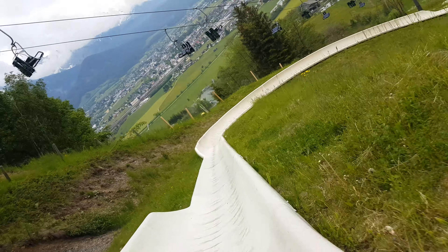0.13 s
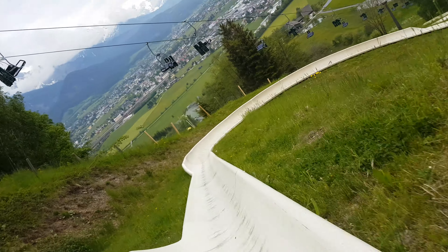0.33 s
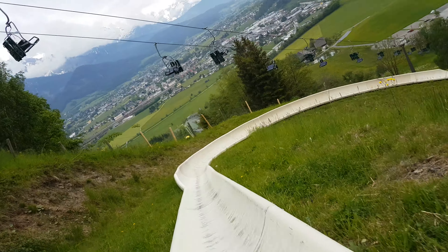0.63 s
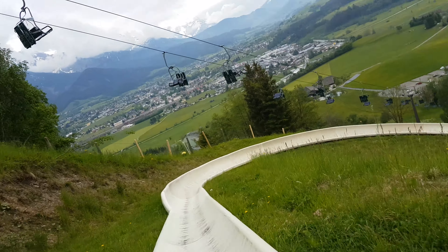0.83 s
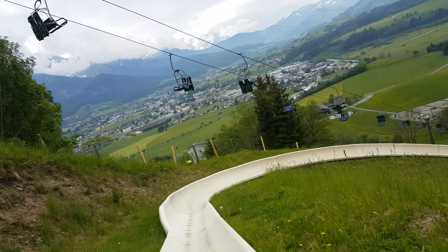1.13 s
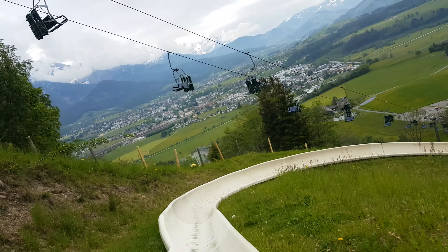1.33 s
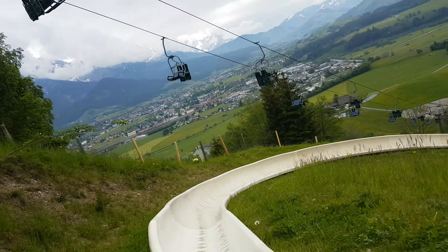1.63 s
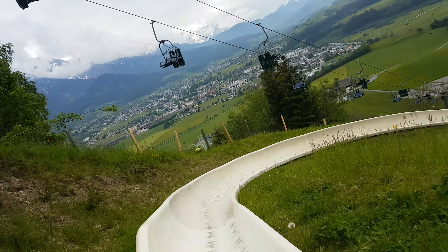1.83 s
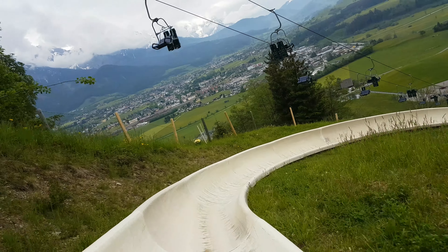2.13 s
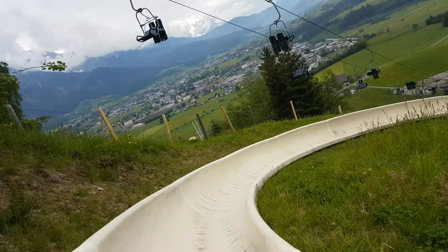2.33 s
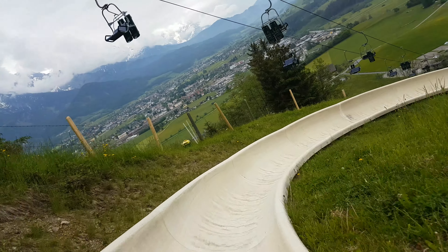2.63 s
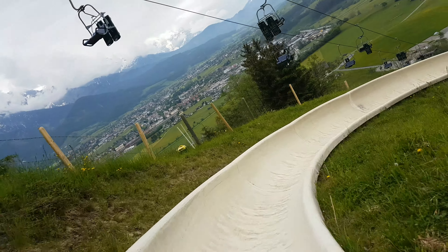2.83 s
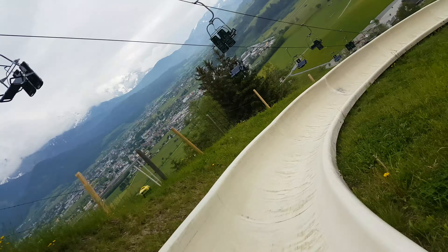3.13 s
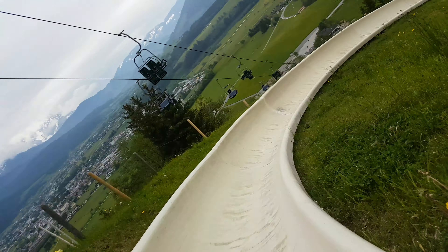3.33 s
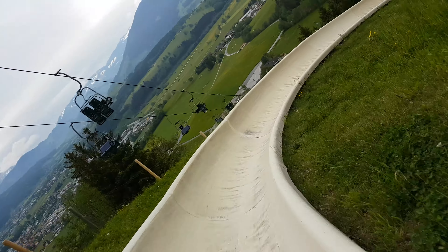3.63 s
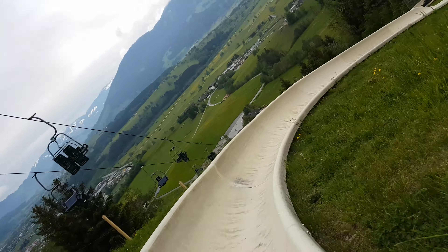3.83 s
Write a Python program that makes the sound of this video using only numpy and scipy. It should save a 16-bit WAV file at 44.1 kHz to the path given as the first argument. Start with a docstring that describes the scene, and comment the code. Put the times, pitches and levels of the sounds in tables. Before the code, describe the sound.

Sled wheels roar along a gritty trough slide, swelling and easing, with hollow booming joint bumps

```python
"""Wheels of a plastic sled roar down a gritty trough-shaped slide, heard from the seat: grains of contact
shake the shell, louder in the bends and pulsing once a turn. Joints in the track knock on the front axle,
then on the rear one, as impulses and decaying chatter that set the shell booming. Runners hiss as filtered
noise, gritty bursts scuff and bump, narrow noise bands sing or ring, grit crackles and wind brushes the mic."""
import sys
import numpy as np
from scipy import signal
from scipy.fft import rfft, irfft, next_fast_len
from scipy.io import wavfile

SR = 44100
rng = np.random.default_rng(int(sys.argv[2]) if len(sys.argv) > 2 else 0)


def unload_wav(signal):
    """Save mono or channel-first audio to the path in sys.argv[1] as 16-bit WAV at rate SR, clipped to [-1, 1]."""
    wavfile.write(
        sys.argv[1],
        SR,
        np.round(np.clip(np.atleast_2d(signal).T, -1, 1) * 32767).astype(np.int16),
    )


N = 176400
TIME = np.arange(N) / SR
SIZE = next_fast_len(N + SR // 4)  # room for filter tails
HZ = np.maximum(np.fft.rfftfreq(SIZE, 1 / SR), 1)


def from_db(db):
    """Decibels to amplitude gain."""
    return 10 ** (np.asarray(db) / 20)


def at_hz(points):
    """Read a table at every spectrum bin, along a log-frequency axis."""
    hz, value = np.transpose(points)
    return np.interp(np.log(HZ), np.log(hz), value)


def drift(rate_hz):
    """Slow random movement with a spread of 1: noise through two equal low-pass poles."""
    step = 40  # samples between slow values
    pole = np.exp(-2 * np.pi * rate_hz * step / SR)
    noise = rng.standard_normal(N // step + 2002)
    slow = signal.lfilter([1], [1, -2 * pole, pole * pole], noise)[2000:]  # drop the settling
    return np.interp(np.arange(N) / step, np.arange(len(slow)), slow / slow.std())


def grains(per_s, spread_db):
    """Two unrelated streams of tiny contacts of uneven size and random sign; rms 1."""
    sizes = from_db(spread_db * np.minimum(rng.exponential(1, (2, N)), 4))
    signs = rng.choice([-1, 1], (2, N))
    contacts = sizes * signs * (rng.random((2, N)) < per_s / SR)
    return contacts / contacts.std()


GRIT_PER_S, GRIT_SPREAD_DB = 5000, 2.8


def grit_grains():
    """Dense gritty contacts."""
    return grains(GRIT_PER_S, GRIT_SPREAD_DB)


def lift_db(resonances):
    """Sum of resonance peaks or dips, in dB at each frequency."""
    return sum(db / (1 + (2 * (HZ - hz) / width) ** 2) for hz, width, db in resonances)


def dying(start_s, t60_s):
    """A sudden start and an exponential decay, 60 dB down after t60."""
    age = TIME - start_s
    return (age >= 0) * np.exp(-np.log(1000) * np.clip(age / t60_s, 0, 10))


def swell(centre_s, length_s):
    """A smooth bell-shaped rise and fall around one moment."""
    return np.exp(-2 * np.minimum(((TIME - centre_s) / length_s) ** 2, 20))


# How alike the two microphone ports sound: f/Hz, likeness (0 to 1)
LIKENESS = [(40, 0.1), (130, 0.64), (350, 0.55), (700, 0.67), (1200, 0.5), (1550, 0), (2300, .5), (3900, 0),
            (5500, 0.41), (8000, 0)]
# Left port minus right port: f/Hz, level/dB
BALANCE = [(330, .7), (600, -1.4), (1100, -0.5), (1500, -3), (5000, -1.5), (8000, 0)]
# Delay of the left port: f/Hz, t/s
PORT_LAG = [(1030, .00011), (1400, .00019), (2400, .00023)]


def radiate(force, colour_db, spread=1):
    """Force streams pass a causal filter of unit power and reach the ports as shared and unlike sound."""
    gain = from_db(colour_db)
    # folding the cepstrum gives the filter minimum phase
    cepstrum = irfft(np.log(gain / np.sqrt(np.mean(gain ** 2))), SIZE)
    cepstrum[1:SIZE // 2] *= 2
    cepstrum[SIZE // 2 + 1:] = 0
    mid, side = rfft(force, SIZE) * np.exp(rfft(cepstrum))
    unlike = np.clip(spread * (1 - at_hz(LIKENESS)), 0, 1)
    sides = np.array([[1], [-1]])  # left, right
    ports = np.sqrt(1 - unlike / 2) * mid + sides * np.sqrt(unlike / 2) * side
    ports = ports * from_db(sides * at_hz(BALANCE) / 2)
    ports[0] *= np.exp(-2j * np.pi * HZ * at_hz(PORT_LAG))
    return irfft(ports, SIZE)[:, :N]


# Wind spectrum: f/Hz, relative level/dB
WIND = [(20, -15), (45, -6.5), (80, -25), (160, 3.5), (600, -67)]
WIND_DB = -8  # relative to the speed level


def wind(speed_db):
    """Lumpy low buffeting that grows with speed, partly different at each port."""
    level_db = WIND_DB + speed_db + 2 * drift(4.7)
    return radiate(rng.standard_normal((2, N)) * from_db(level_db), at_hz(WIND))


# Grit snapping under a wheel: t/s, level/dB
TICKS = [(.243, -29.5), (3.733, -30)]
TICK_T60_S = 0.04
# Bright crack spectrum, also used by the joints: f/Hz, relative level/dB
CRACK = [(100, -11.5), (600, -13), (1100, 8.5), (1800, 2.5), (2600, -6), (4200, -13), (6400, -13),
         (8500, -27.5), (16000, -26.5)]
# Axle resonances, also rung by the joints: f/Hz, width/Hz, lift/dB
AXLE = [(3090, 260, 5), (4920, 260, 5), (6380, 300, 5)]


def ticks():
    """Grit snaps in a short bright crackle that rings the axle."""
    snap = sum(from_db(db) * dying(s, TICK_T60_S) for s, db in TICKS)
    # half the dB contrast of a joint crack
    return radiate(grit_grains() * snap, at_hz(CRACK) / 2 + lift_db(AXLE))


# A rubbing wheel or runner sings, or the shell rings after a blow: t/s, length/s, f/Hz, width/Hz, level/dB
NARROW_TONES = [(0.031, 0.01, 730, 130, -12), (0.8, 0.084, 1560, 180, -27.5), (1.1, 0.44, 5220, 450, -50),
                (1.337, .07, 5140, 550, -37), (1.474, 0.032, 1525, 180, -18),
                (1.593, 0.088, 2060, 260, -21.5), (1.647, 0.0066, 830, 200, -15),
                (1.735, 0.019, 800, 280, -18), (2.888, 0.041, 4450, 1300, -31),
                (2.914, 0.1, 1070, 200, -24.5), (3.585, 0.04, 9500, 3500, -42.5)]


def narrow_tones():
    """Brief narrow-band noise tones: a rubbing wheel or runner sings, or the shell rings after a blow."""
    tones = 0
    for s, length, hz, width, db in NARROW_TONES:
        edges = np.clip([hz - width / 2, hz + width / 2], 50, SR / 2.2)
        band = signal.butter(2, edges, "band", fs=SR, output="sos")
        tone = signal.sosfilt(band, rng.standard_normal((2, N)))
        tones = tones + tone / tone.std() * from_db(db) * swell(s, length)
    return radiate(tones, np.zeros_like(HZ))


# Short gritty bursts (scuffs, wheel-turn pulses and soft bumps): t/s, length/s, level/dB
GRITTY_BURSTS = [(0.087, 0.026, -20.5), (.243, 0.018, -24.5), (0.903, 0.038, -22), (1.03, 0.0051, -18),
                 (1.974, 0.028, -26.5), (2.366, 0.0098, -25), (2.444, 0.015, -23), (2.53, 0.18, -25.5),
                 (2.62, 0.02, -22.5), (1.67, 0.0084, -11.5), (2.811, 0.013, -19.5), (3.295, .018, -18.5),
                 (3.714, 0.024, -24), (3.761, 0.015, -14), (3.855, 0.035, -23)]
# Runner hiss spectrum: f/Hz, relative level/dB
HISS = [(2000, 2.5), (6000, 6), (9000, -2), (11500, 1.5), (14000, -0.5), (16000, -3)]
# Grit roar spectrum, also used by the wheels: f/Hz, relative level/dB
ROAR = [(150, -16.5), (350, 0), (650, -1.5), (950, 2.5), (1080, -0.5), (1600, 2), (2050, -1), (2600, -9.5),
        (3500, -14), (5300, -21), (6500, -25), (9000, -38.5), (16000, -52)]
# Resonances of shell and wheels, shared by bursts, joints and wheels: f/Hz, width/Hz, lift/dB
SHELL = [(112, 35, 5.5), (249.6, 12, 3), (348, 34, 3.5), (440, 11, -0.5), (628, 26, 2), (787, 14, 6),
         (1269, 53, 5), (1593, 33, 1.5), (1960, 37, -4)]
HISS_DB, HISS_FLUTTER_DB = 1, 1.44


def runners_and_bursts(hiss_db):
    """Sliding friction makes a smooth hiss; swelling grains make scuffs, wheel-turn pulses and soft bumps."""
    level_db = HISS_DB + hiss_db + HISS_FLUTTER_DB * drift(49)
    hiss = rng.standard_normal((2, N)) * from_db(level_db)
    burst_level = sum(from_db(db) * swell(s, length) for s, length, db in GRITTY_BURSTS)
    bursts = grit_grains() * burst_level
    bright = radiate(hiss + from_db(-24) * bursts, at_hz(HISS))
    return bright + radiate(bursts, at_hz(ROAR) + lift_db(SHELL))


# A wheel hits a joint or bump: t/s, then relative boom level/dB, thud level/dB, crack level/dB, rattle t60/s
JOINTS = [(.0075, -1, -7, -12, 0.21), (0.0946, -18, -22, -26, .1), (0.5227, -13, -15.5, -22, 0.22),
          (0.61, -19, -19.5, -28.5, 0.14), (1.172, -41, -18.5, -27, .03), (1.2373, -12, -17, -21, 0.091),
          (1.6263, -24, -18.5, -12, 0.084), (1.641, -12.5, -14.5, -22, .074), (1.7023, -12, -8.5, -16, 0.2),
          (2.152, -10.5, -17.5, -20, 0.21), (3.212, -1.5, -12.5, -23, 0.29), (3.751, -8.5, -14, -14, 0.36),
          (3.8477, -11, -27, -18, .06)]
# Spectra of first knock, shell boom and chattering thud: f/Hz, relative level/dB
KNOCK = [(40, -29), (150, -16.5), (330, -3), (700, 10), (1000, -8.5), (1850, -7), (2700, -8.5), (7000, -51)]
BOOM = [(30, -29.5), (70, -22.5), (115, -8), (240, -5.5), (340, 3), (420, 2), (520, -11.5), (1000, -30),
        (4000, -78)]
THUD = [(30, -48), (70, -18), (120, -9), (250, -1), (400, -2.5), (550, 0), (780, 0.5), (1050, -4),
        (1900, -9), (2700, -18), (6000, -35), (16000, -83)]
STRIKE_DB, BOOM_STRIKE_DB, CRACK_STRIKE_DB = 23, 19, 11  # impulse gains
BLOW_DB, BLOW_T60_S = -7.5, 0.048
REBOUND_S, REBOUND_DB = 0.019, -4  # after and relative to the blow
RATTLE_DB, RATTLES_PER_S, RATTLE_SPREAD_DB = -1, 1200, 2
CRACK_T60_S, CRACK_TAIL_DB = 0.051, 2
BOOM_LAG_S = 0.0013  # the heavy shell answers just after the crack
JOINT_SPREAD = 0.064  # share of the unlike sound that a direct knock keeps


def joints():
    """Each joint knocks, cracks and booms; the wheel chatters and rebounds, and the shell rattles out."""
    knock, boom, thud, crack = np.zeros((4, 2, N))
    chatter = rng.choice([-1., 1.], (3, 2, N))
    rattles = grains(RATTLES_PER_S, RATTLE_SPREAD_DB)
    for s, boom_db, thud_db, crack_db, t60 in JOINTS:
        strike = np.zeros((2, N))
        strike[0, max(int(s * SR), 0)] = 1  # one impulse in the shared stream
        rebound = from_db(REBOUND_DB) * dying(s + REBOUND_S, BLOW_T60_S)
        blow = from_db(BLOW_DB) * (dying(s, BLOW_T60_S) + rebound)
        rattle = from_db(RATTLE_DB) * dying(s, t60) * rattles
        splinter = dying(s, CRACK_T60_S) + from_db(CRACK_TAIL_DB) * dying(s, 0.083 * t60)
        knock += from_db(thud_db + STRIKE_DB) * strike
        thud += from_db(thud_db) * (chatter[0] * blow + rattle)
        shaking = chatter[1] * blow + rattle[::-1] / 2  # rattle streams swapped
        boom += from_db(boom_db) * (from_db(BOOM_STRIKE_DB) * strike + shaking)
        crack += from_db(crack_db) * (from_db(CRACK_STRIKE_DB) * strike + chatter[2] * splinter)
    shell = lift_db(SHELL)
    boom = np.roll(boom, int(BOOM_LAG_S * SR), axis=1)
    direct = radiate(knock, at_hz(KNOCK) + shell, JOINT_SPREAD)
    direct = direct + radiate(boom, at_hz(BOOM) + shell, JOINT_SPREAD)
    chattering = radiate(thud, at_hz(THUD) + shell)
    return direct + chattering + radiate(crack, at_hz(CRACK) + lift_db(AXLE))


HOP_LOSS, HOP_T60_S = 0.8, 0.42  # share of gain lost per unit of blow strength; recovery


def grip():
    """A hard blow unloads the wheels, so wheel, runner and burst sound dips and recovers."""
    hop = sum(from_db(max(boom_db, thud_db)) * dying(s, HOP_T60_S)
              for s, boom_db, thud_db, _, _ in JOINTS)
    return np.clip(1 - HOP_LOSS * hop, 0.2, 1)


PATCHY_DB, PATCHY_PER_S = 2.8, 30


def patchy(sound):
    """Each quarter octave flares and fades on its own as the contact patch changes."""
    spectrum = rfft(sound, SIZE)
    place = np.clip(4 * np.log2(HZ / 400), 0, 15)  # the end bands take in all lower or higher sound
    out = 0
    for k in range(16):
        band = irfft(spectrum * np.maximum(1 - abs(place - k), 0), SIZE)[:, :N]
        flare_db = PATCHY_DB * np.clip(drift(PATCHY_PER_S), -2, 2)
        out = out + band * from_db(flare_db)
    return out


# Low rumble spectrum: f/Hz, relative level/dB
RUMBLE = [(30, -56), (60, -5), (110, -4.5), (170, 0), (280, 3), (450, 3.5), (650, 0), (1000, -8.5),
          (2500, -58.5)]
WHEEL_TURNS_PER_S, WHEEL_HIGH_SPOT_S = 11.2, 2.436  # turn rate; moment of one pulse peak
RUMBLE_DB, RUMBLE_PULSE_DB, RUMBLE_FLUTTER_DB = 0, 0.7, 1.1
ROAR_DB, WHEEL_PULSE_DB, ROAR_FLUTTER_DB = -0.73, 1.5, 1.5
LUMPS_PER_S, LUMP_SPREAD_DB = 1300, 2.0


def wheels(rumble_db, roar_db):
    """Lumps and grit under the wheels shake the shell, harder once in every turn."""
    turn = np.cos(2 * np.pi * WHEEL_TURNS_PER_S * (TIME - WHEEL_HIGH_SPOT_S))
    lump_db = RUMBLE_DB + rumble_db + RUMBLE_PULSE_DB * turn + RUMBLE_FLUTTER_DB * drift(24)
    lumps = grains(LUMPS_PER_S, LUMP_SPREAD_DB) * from_db(lump_db)
    grit_db = ROAR_DB + roar_db + WHEEL_PULSE_DB * turn + ROAR_FLUTTER_DB * drift(71)
    grit = grit_grains() * from_db(grit_db)
    shell = lift_db(SHELL)
    rumble = radiate(lumps, at_hz(RUMBLE) + shell)
    return rumble + patchy(radiate(grit, at_hz(ROAR) + shell))


# The ride: t/s, then relative rumble level/dB, wheel roar level/dB, runner hiss level/dB
RIDE = [(0.0, -19, -19.5, -42), (0.17, -27.5, -27, -49.5), (0.24, -26.5, -28, -52), (0.31, -30.5, -33, -55),
        (0.45, -37, -34, -52), (0.8, -31.5, -26, -50.5), (1.15, -27, -24, -45.5), (1.43, -16, -18, -39.5),
        (1.5, -25, -20, -38), (1.71, -15, -16.5, -39), (1.85, -32, -31.5, -53.5),
        (1.99, -30.5, -37.5, -53.5), (2.06, -36, -35.5, -53), (2.27, -28, -24.5, -49.5),
        (2.48, -30, -30.5, -42.5), (2.97, -22, -15.5, -40.5), (3.04, -23, -21, -40),
        (3.18, -19, -17.5, -38), (3.46, -30, -29, -47), (3.6, -28, -27, -42), (3.67, -29, -31, -43),
        (3.74, -33.5, -29, -50), (4.0, -32.5, -30.5, -50.5)]


def scene():
    """Everything heard from the moving sled."""
    s, *levels = np.transpose(RIDE)
    rumble_db, roar_db, hiss_db = [np.interp(TIME, s, level) for level in levels]
    speed_db = (rumble_db + hiss_db) / 2  # both grow with speed
    rolling = grip() * (wheels(rumble_db, roar_db) + runners_and_bursts(hiss_db))
    return rolling + narrow_tones() + joints() + ticks() + wind(speed_db)


CUTOFF_HZ = 16100


def record(dry):
    """Soft overload rounds the loudest peaks, then a steep low-pass cuts the top."""
    rounded = dry / (1 + dry ** 6) ** (1 / 6)
    low_pass = signal.ellip(10, 0.1, 70, CUTOFF_HZ, fs=SR, output="sos")
    return signal.sosfilt(low_pass, rounded)


dry = scene()
out = record(dry)
unload_wav(out)
```